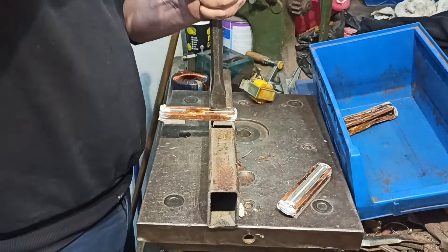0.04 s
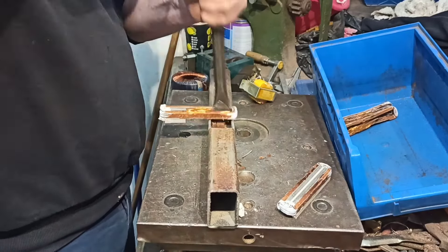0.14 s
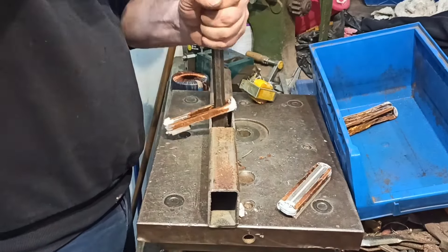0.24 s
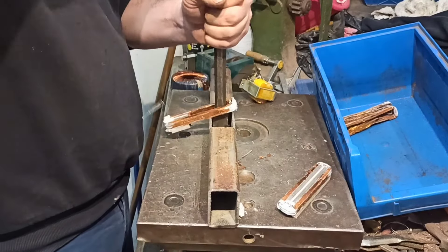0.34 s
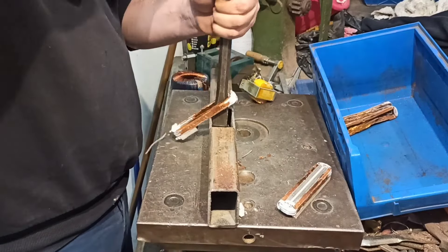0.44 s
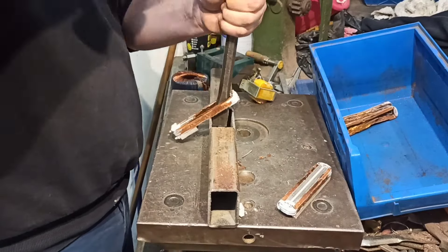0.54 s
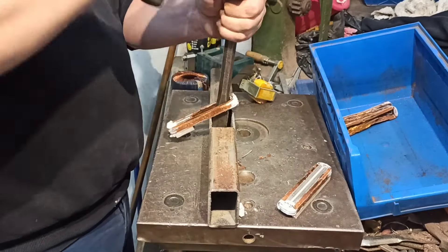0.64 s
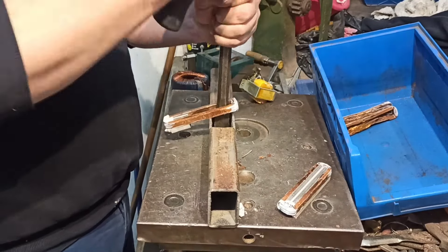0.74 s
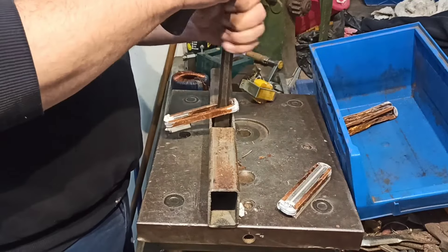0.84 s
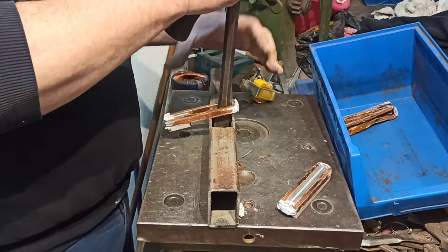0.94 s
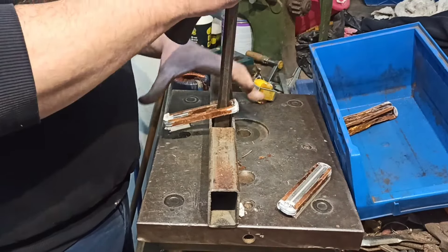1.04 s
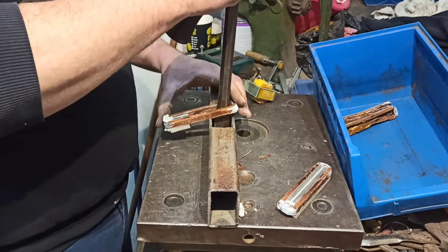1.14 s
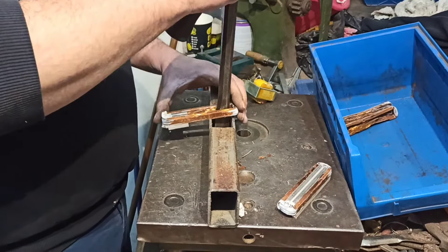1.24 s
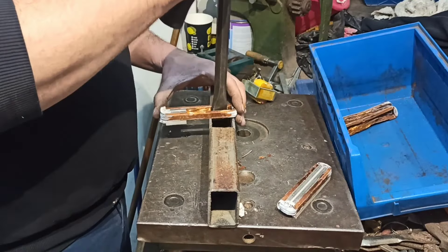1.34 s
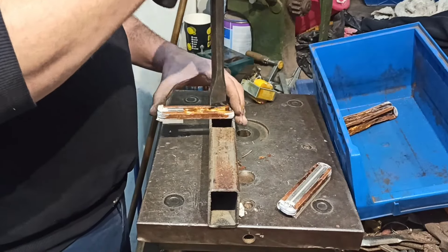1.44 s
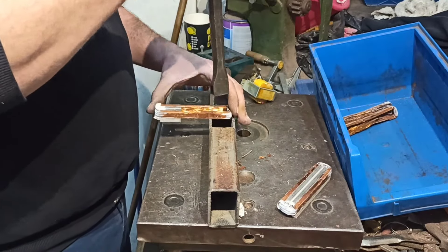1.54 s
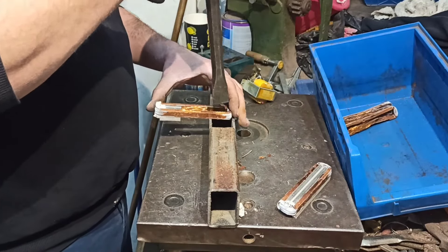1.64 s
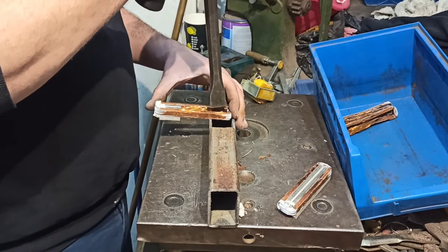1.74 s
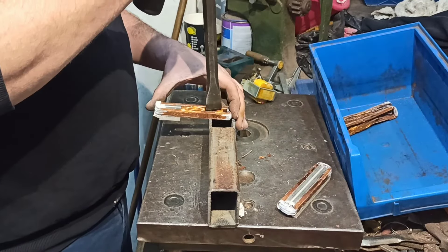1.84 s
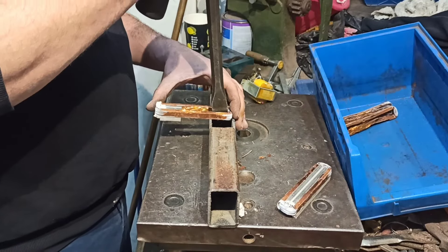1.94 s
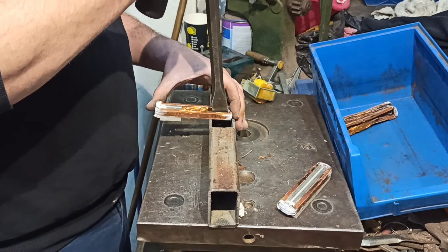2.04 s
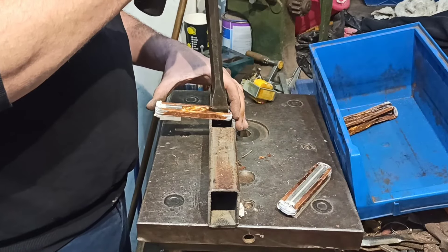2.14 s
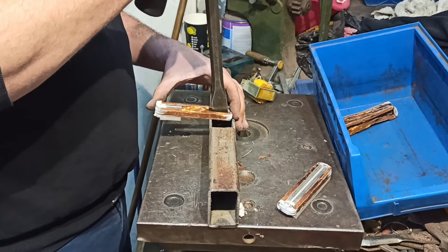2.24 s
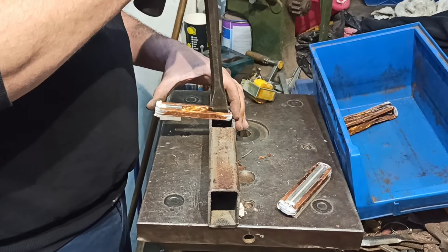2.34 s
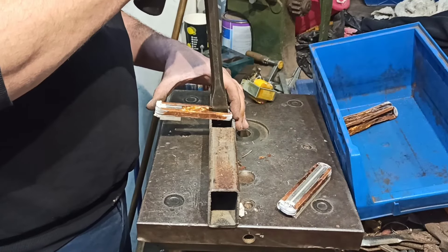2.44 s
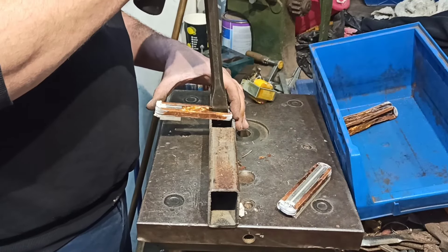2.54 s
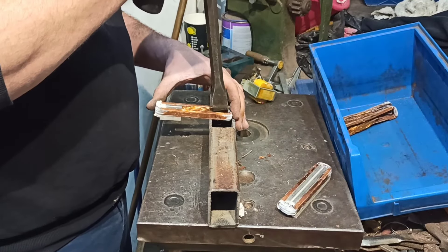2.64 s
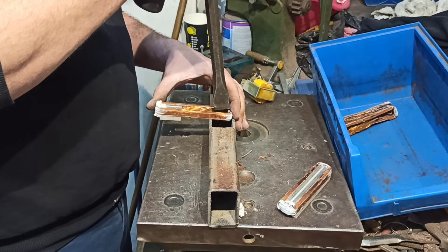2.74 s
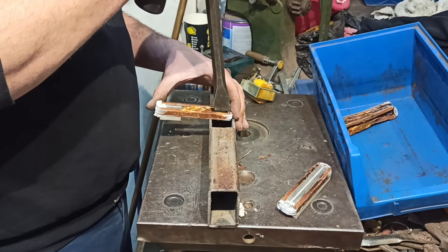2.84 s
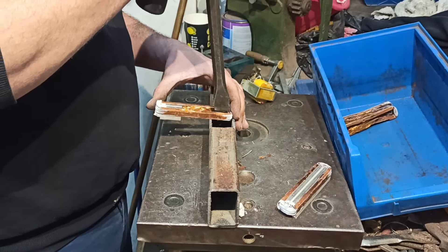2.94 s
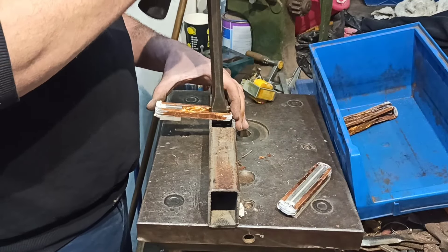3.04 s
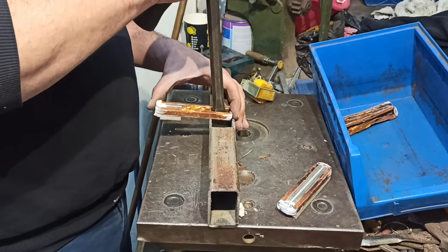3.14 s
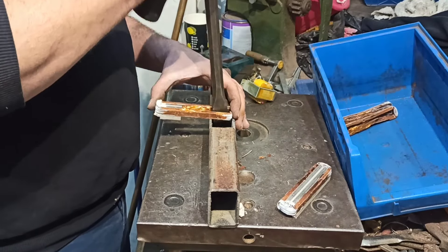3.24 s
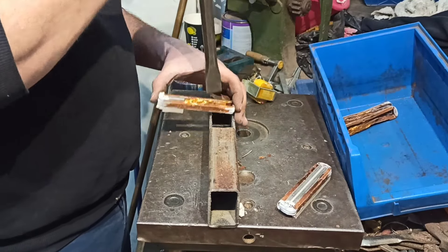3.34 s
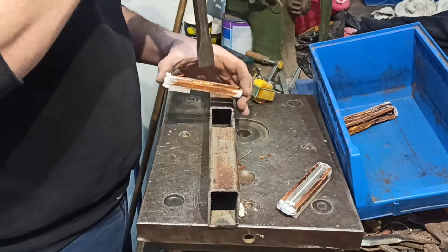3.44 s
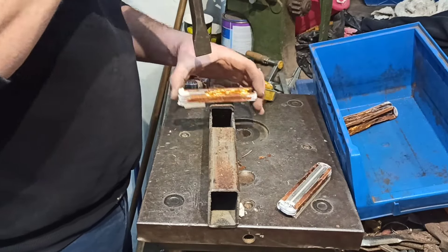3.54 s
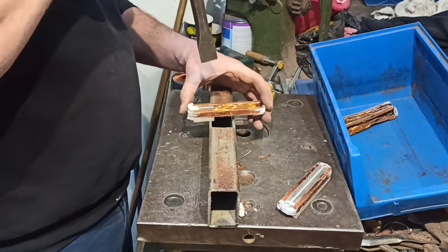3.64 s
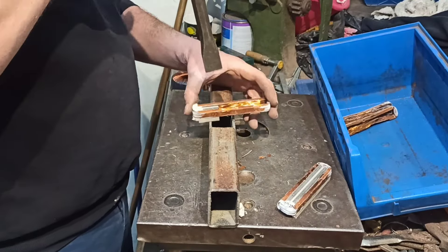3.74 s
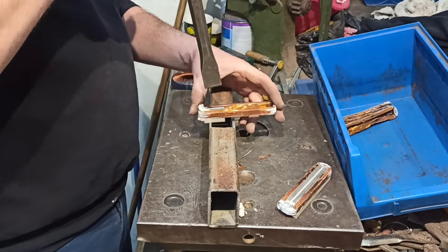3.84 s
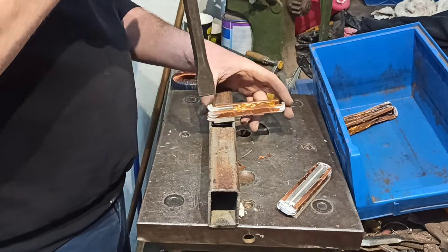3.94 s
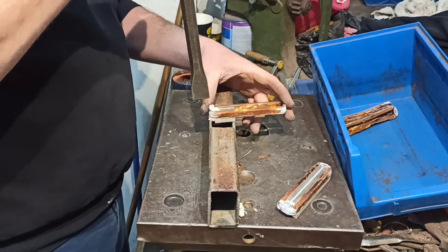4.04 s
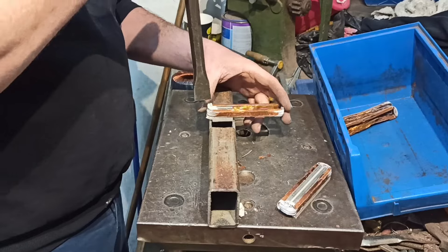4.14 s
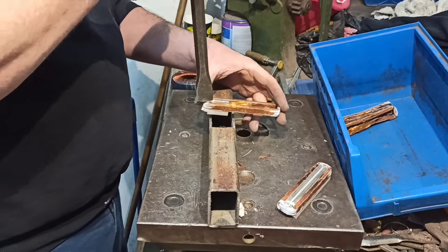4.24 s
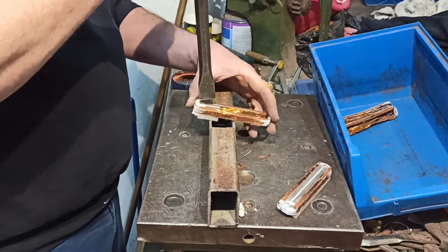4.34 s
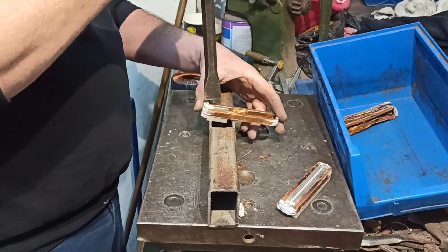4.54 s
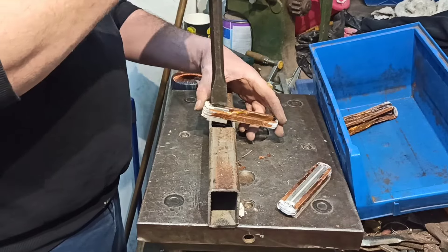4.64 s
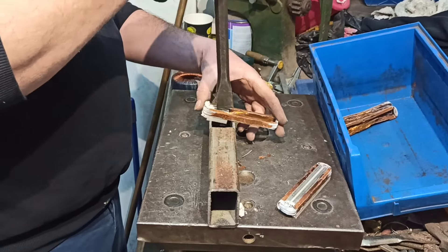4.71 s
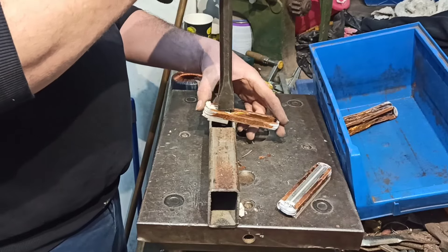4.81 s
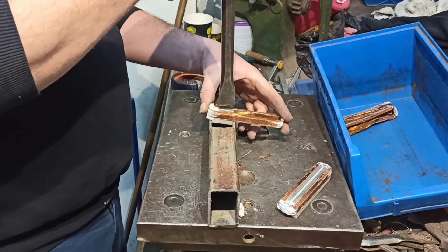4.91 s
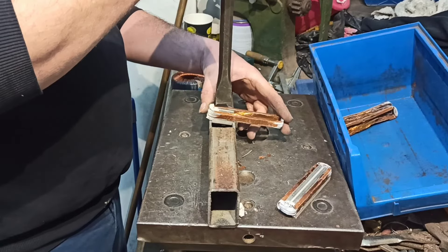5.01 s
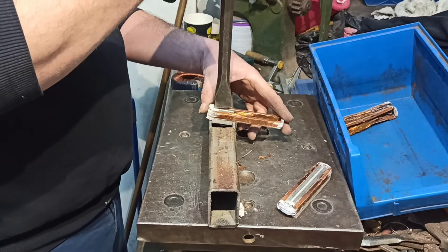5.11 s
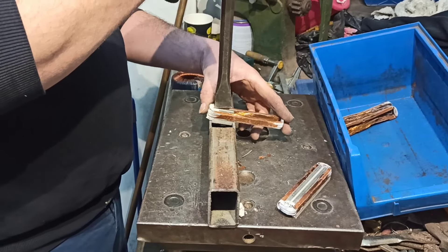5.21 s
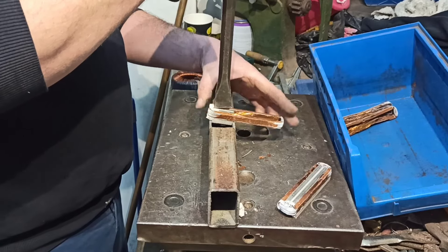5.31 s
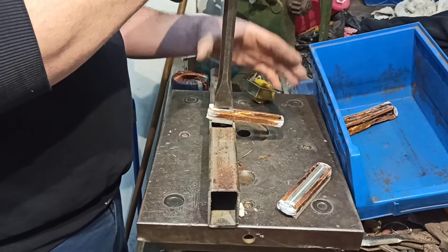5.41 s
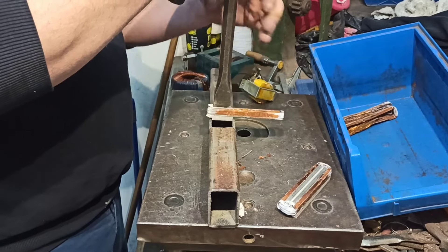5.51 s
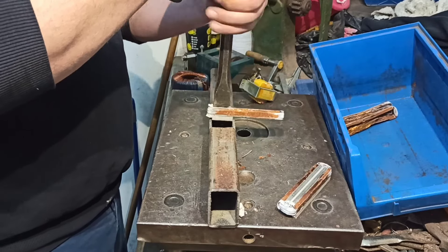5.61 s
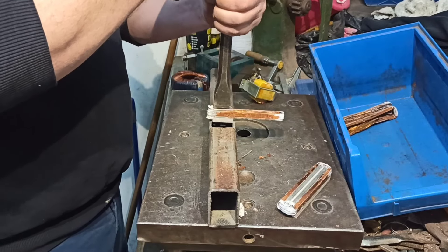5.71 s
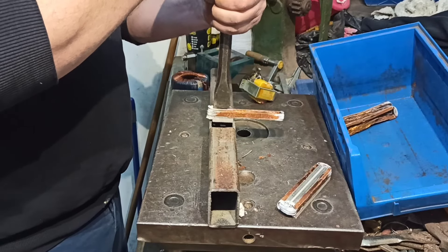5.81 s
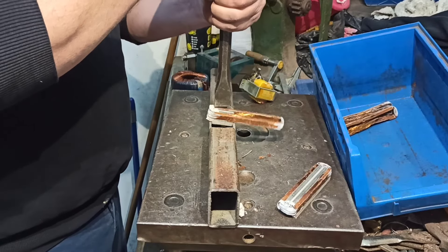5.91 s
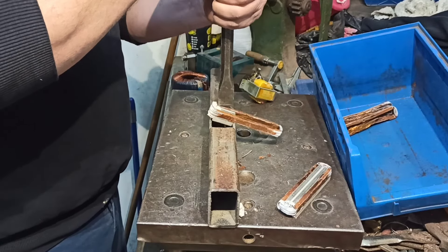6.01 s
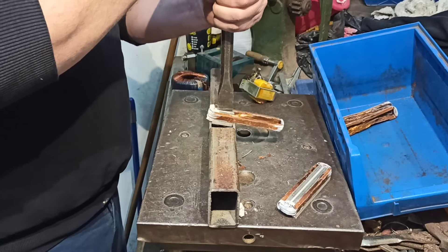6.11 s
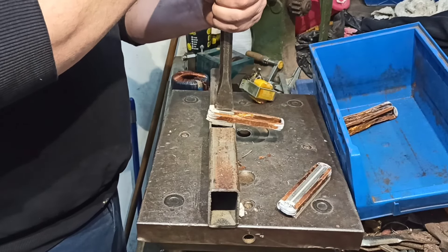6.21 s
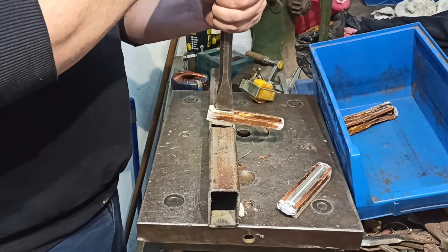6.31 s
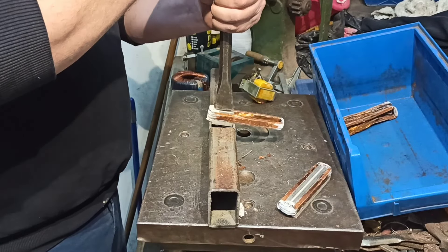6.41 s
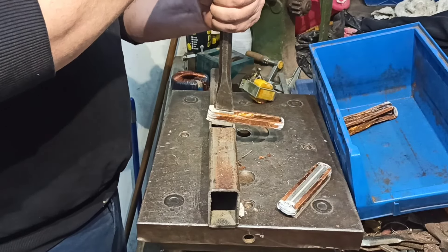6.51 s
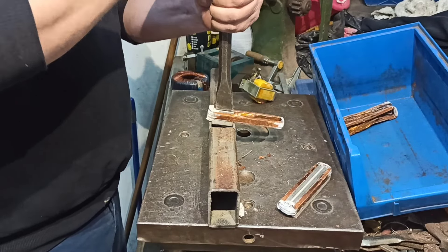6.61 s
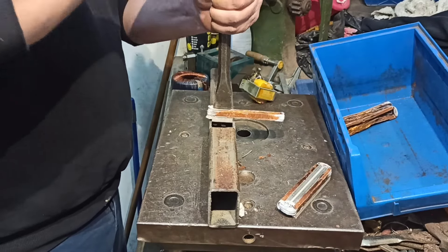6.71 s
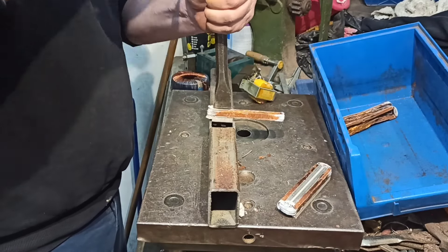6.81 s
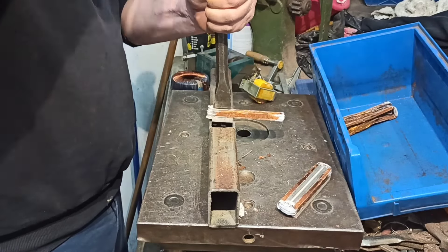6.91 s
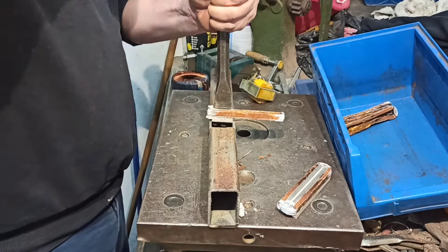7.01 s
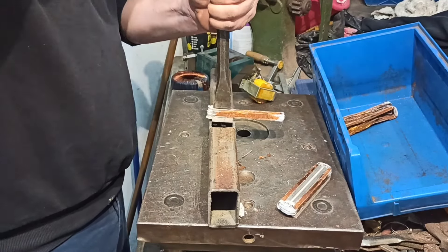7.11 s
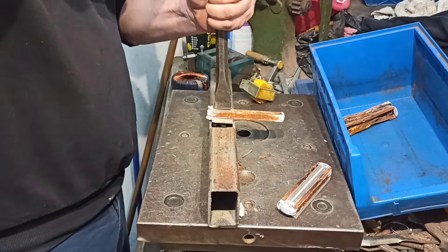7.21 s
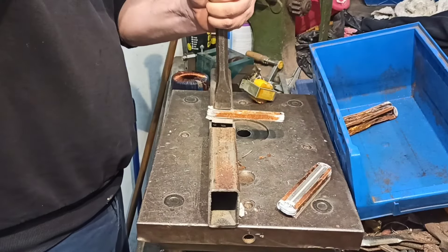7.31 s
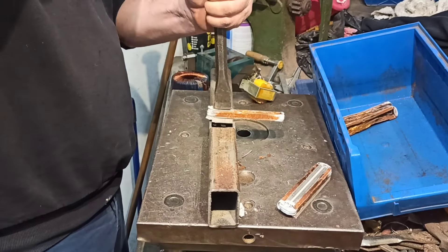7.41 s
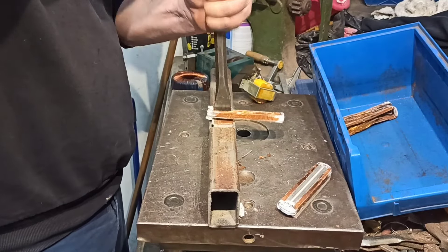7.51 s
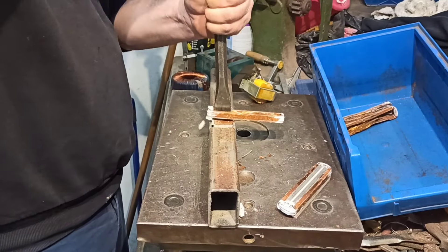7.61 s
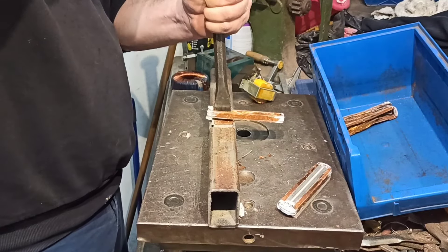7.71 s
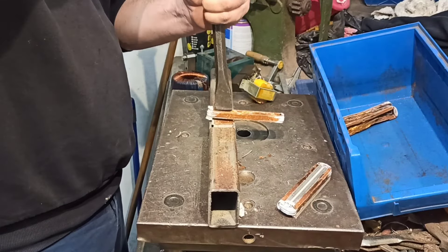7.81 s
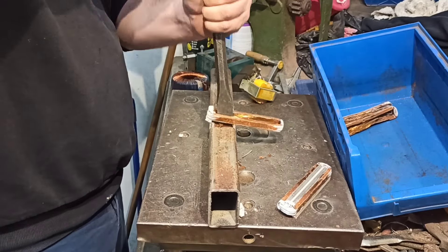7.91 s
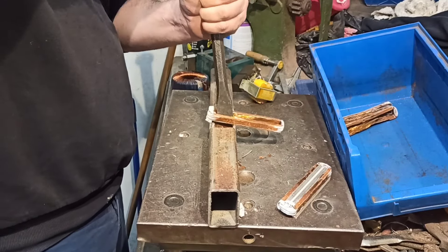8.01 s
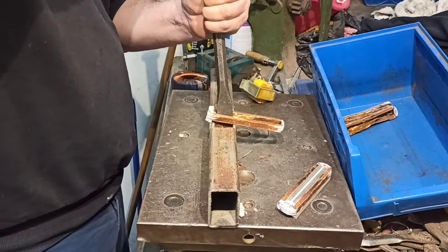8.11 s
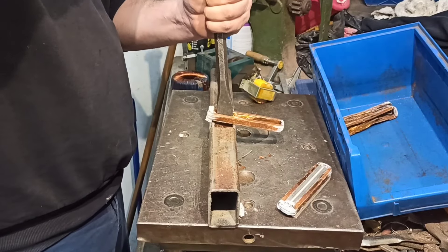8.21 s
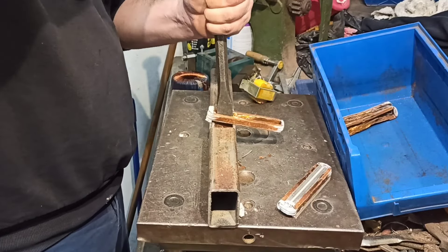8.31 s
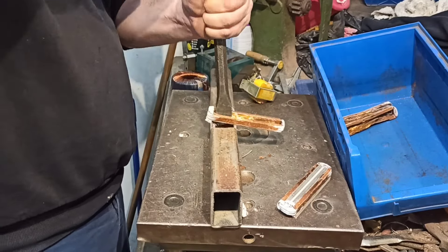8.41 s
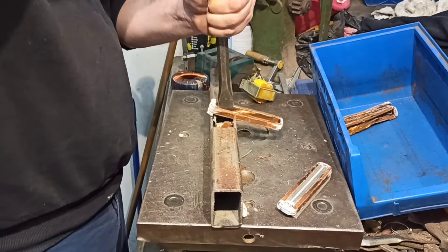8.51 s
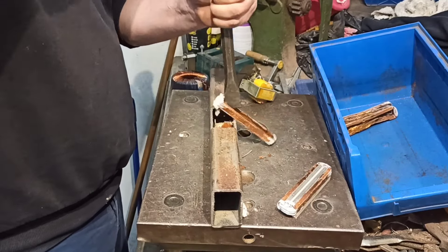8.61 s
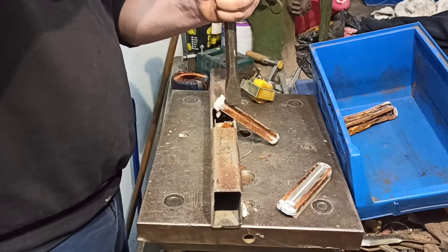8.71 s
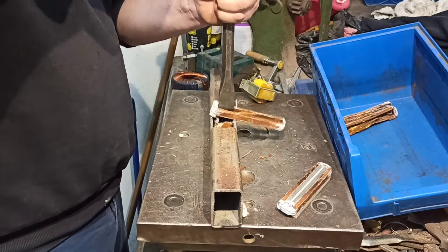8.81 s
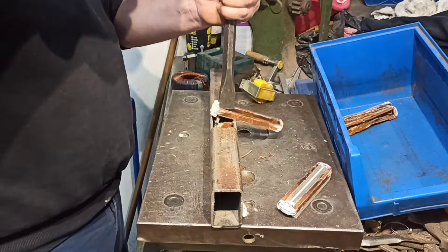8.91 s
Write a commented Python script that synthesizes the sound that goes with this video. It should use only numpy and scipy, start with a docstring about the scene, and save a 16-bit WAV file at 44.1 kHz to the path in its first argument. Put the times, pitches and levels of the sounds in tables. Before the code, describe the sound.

Close-up metalwork on a steel bench: a sharp, bright opening strike with a small rebound, then several seconds of light handling clinks, hollow tube knocks and brief rusty scrapes, including a rapid skipping rattle. After a near-silent pause, four chisel blows, the first weak, the last biting deep and ringing longest. Two final clinks. The room rings briefly over faint hum; a limiter flattens the peaks.

```python
"""A hammer blow drives a cold chisel into a small transformer core lying on a steel tube on a workbench.
Then the core is prised, lifted and set down with small clinks; the chisel squeaks faintly and skips
free, and the core is dragged in short rasps. Four more blows follow, and two last clinks.
Steel is made of dying sines plus short noise cracks, and drags of random tiny slips. The room rings
after each sound over quiet air and hum, and the recorder's limiter holds the loud blows down."""
import sys
import numpy as np
from scipy import signal
from scipy.fft import rfft, irfft
from scipy.io import wavfile
from scipy.ndimage import uniform_filter1d

SR = 44100
rng = np.random.default_rng(int(sys.argv[2]) if len(sys.argv) > 2 else 0)


def digitize_waveform(pressure):
    """Quantize a signal to 16-bit integers and store it at the path in sys.argv[1].

    Rows of a 2-D input are taken as channels; values are limited to [-1, 1].
    """
    field = np.atleast_2d(pressure).T
    bounded = np.clip(field, -1, 1)
    quanta = np.round(bounded * 32767).astype(np.int16)
    wavfile.write(sys.argv[1], SR, quanta)


N = 394694


def gain_of(db):
    """Turns decibels into an amplitude factor."""
    return 10 ** (np.asarray(db) / 20)


def evened(x):
    """Scales a sound to an rms (average strength) of 1."""
    return x / np.sqrt(np.mean(x ** 2) + 1e-20)


def read(points, hz):
    """Reads a table between its points, on a log-frequency axis."""
    f, value = np.transpose(points)
    return np.interp(np.log(hz + 1), np.log(f + 1), value)


def add(mix, start_s, sound):
    """Mixes a sound in from a start time, cut off at the end of the mix."""
    part = mix[round(start_s * SR):][:len(sound)]
    part += sound[:len(part)]


def noise(spectrum, size, tilt_db=0):
    """Noise of rms 1 shaped by a spectrum, tilted by so many dB per octave."""
    hz = np.fft.rfftfreq(size, 1 / SR)
    db = read(spectrum, hz) + tilt_db * np.log2(np.clip(hz, 300, 12000))
    random_phase = np.exp(2j * np.pi * rng.random(len(hz)))
    return evened(irfft(random_phase * gain_of(db), size))


def ring(modes, length=1, tilt_db=0, spread_db=0.5):
    """Struck steel as dying sines; mode levels vary a little by chance, and the tilt acts above 3600 Hz."""
    hz, db, t60 = np.transpose(modes)[:, :, None]
    t = np.arange(SR // 2) / SR
    phase, luck = rng.random((2, len(modes), 1))
    tilt = tilt_db * np.log2(np.maximum(hz / 3600, 1))  # dB per octave
    db = db + spread_db * (2 * luck - 1) + tilt
    # t60 is the time to fall by 60 dB, a factor of 1000
    level = gain_of(db) * np.exp(-np.log(1000) * t / (t60 * length))
    sines = level * np.sin(2 * np.pi * (hz * t + phase))
    soft_start = -np.expm1(-t / 0.0029)
    return sines.sum(0) * soft_start


# spectrum of the still workshop air: (frequency [Hz], density [dB per Hz])
AIR_SPECTRUM = [(20, -47.5), (45, -29.5), (62, -9.5), (86, 2.5), (110, -7), (140, -5.5), (300, -8.5),
                (500, -14), (800, -17.5), (1500, -28), (5500, -40.5), (7000, -35), (9000, -42),
                (15000, -43)]
# faint hum notes: (frequency [Hz], level [dB])
HUM_NOTES = [(87, -75), (215, -74.5), (390, -84), (781, -86)]


def background(air_db=-69, waver_hz=5):
    """Still air is shaped noise; each hum note is a sine whose phase wanders slowly."""
    t = np.arange(N) / SR
    out = gain_of(air_db) * noise(AIR_SPECTRUM, N)
    slow = np.fft.rfftfreq(N, 1 / SR) < waver_hz
    for hz, db in HUM_NOTES:
        waver = evened(irfft(rfft(rng.standard_normal(N)) * slow, N))
        out += gain_of(db) * evened(np.sin(2 * np.pi * hz * t + waver))
    return out


# how long the workshop rings in each band: (frequency [Hz], time to fall 60 dB [s])
ROOM_DECAY = [(100, 0.41), (400, 0.45), (1500, 0.57), (4000, 0.53), (7500, 0.48), (14000, 0.31)]


def workshop(x, build_s=0.00033, clutter_db=-4, wall_s=0.0075, lowest_hz=95):
    """Nearby clutter answers first, the walls a little later and stronger; each band dies at its own speed."""
    hz, t, bands = signal.stft(rng.standard_normal(SR), SR, nperseg=256)
    decay = np.exp(-np.log(1000) * t / read(ROOM_DECAY, hz)[:, None])
    tail = signal.istft(bands * decay, SR, nperseg=256)[1]
    t = np.arange(len(tail)) / SR
    tail *= -np.expm1(-t / build_s) * gain_of(clutter_db * (t < wall_s))
    # the small room holds no deep bass
    no_bass = signal.butter(2, lowest_hz, "highpass", fs=SR, output="sos")
    tail = signal.sosfilt(no_bass, tail)
    return signal.fftconvolve(x, tail / np.linalg.norm(tail))[:N]


def stroke(length_s):
    """Pressure that swells and eases off in one arch."""
    return np.sin(np.pi * np.arange(0, length_s, 1 / SR) / length_s)


def squeak(start_s=1.58, length_s=0.18, hz=6380, peak_db=-76.5):
    """The chisel edge leans into the steel: a faint, thin sine that swells and fades."""
    out, pressure = np.zeros(N), stroke(length_s)
    note = np.sin(2 * np.pi * hz * np.arange(len(pressure)) / SR)
    add(out, start_s, gain_of(peak_db) * pressure ** 2 * note)
    return out


# ringing notes of the steel tube, also used by clinks and blows:
# (frequency [Hz], level [dB], time to fall 60 dB [s])
TUBE_MODES = [(861, -18, .15), (2336, -13, .25), (2410, -9, .2), (2560, -17, .2), (3079, -12, .35),
              (3272, -10, .3), (3666, -7, .2), (3738, -13, .25), (3946, -16, .25), (4253, -14, .25),
              (4572, -17, .25), (5070, -20, .25), (5335, -19, .3), (5725, -14, .2), (5852, -11, .3),
              (5970, -14, .2), (6323, -2, .3), (6616, -2, .2), (6822, -2, .25), (6850, -5, .2),
              (7271, 0, .3), (7635, -3, .2), (8145, -10, .25)]
# notes that sliding feeds most: (frequency [Hz], level [dB], time to fall 60 dB [s])
SQUEAL_MODES = [(3079, 0, .3), (2380, 2, .07), (305, -2, .12)]
# steel sliding over rust: (frequency [Hz], density [dB per Hz])
RASP_SPECTRUM = [(30, -35), (100, -19), (300, 6), (450, -28.5), (750, 8.5), (1200, -43), (1750, 8),
                 (1920, -19.5), (2150, 6), (2450, -6), (2700, -16), (3700, -7), (5200, -26), (7000, -12.5),
                 (10000, -39)]
# the core dragged over the tube: (start time [s], length [s], level of the rubbing force [dB])
DRAG_STROKES = [(3.795, 0.23, -57.5), (4.162, 0.02, -68.5), (4.469, 0.048, -51.5), (4.864, 0.06, -60),
                (5.535, 0.029, -80), (5.944, 0.096, -67)]


def drags(slips_per_s=600, rasp_db=-3, tube_db=-7, squeal_db=-4):
    """Tiny random slips rasp on the rusty tube and keep it singing."""
    force, t = np.zeros(N), np.arange(1024) / SR
    for start_s, length_s, db in DRAG_STROKES:
        add(force, start_s, gain_of(db) * stroke(length_s))
    slip_happens = rng.random(N) < slips_per_s / SR
    slips = evened(rng.standard_normal(N) * slip_happens) * force
    rasp = noise(RASP_SPECTRUM, size=1024) * np.exp(-t / .004)
    bodies = (rasp, rasp_db), (ring(TUBE_MODES), tube_db), (ring(SQUEAL_MODES), squeal_db)
    out = np.zeros(N)
    for body, db in bodies:
        # each slip sets off a copy of the body's sound
        out += gain_of(db) * signal.oaconvolve(slips, body / np.linalg.norm(body))[:N]
    return out


# steel hitting steel: (frequency [Hz], density [dB per Hz])
CRACK_SPECTRUM = [(25, -29.5), (70, -13), (200, -4), (450, -10.5), (720, 4), (1150, -8.5), (1900, 5),
                  (2800, -7), (3800, 6), (5200, -5.5), (6600, 6), (7900, 4), (8800, -11), (12000, -11),
                  (15000, -16)]


def crack(tilt_db, contact_s, chatter_db=3, rise_s=0.00024):
    """Steel chatters on steel: unsteady noise that dies within milliseconds."""
    t = np.arange(SR // 2) / SR
    wander = evened(uniform_filter1d(rng.standard_normal(len(t)), size=40))
    chatter = evened(gain_of(chatter_db * wander))
    fade = np.exp(-t / max(contact_s, 1 / SR)) * -np.expm1(-t / rise_s)
    return noise(CRACK_SPECTRUM, len(t), tilt_db) * chatter * fade


# ringing notes of the chisel, also used by skips and blows:
# (frequency [Hz], level [dB], time to fall 60 dB [s])
CHISEL_MODES = [(3595, -10, .13), (3700, -9, .11), (5610, -17, .13), (7550, -8, .08), (7603, 0, .15),
                (7645, -7, .1), (1750, -19, .05), (6020, -18, .06), (8020, -15, .1), (13800, -29, .08),
                (15300, -24, .04)]
# the tube rocking on the bench, also used by skips: (frequency [Hz], level [dB], time to fall 60 dB [s])
KNOCK_MODES = [(140, -7, 0.26), (214.7, -11.5, 0.087), (299.6, 3, 0.1), (352, -5, 0.083),
               (697.6, -1.5, 0.071), (786, -1, 0.069)]


def touch(tilt_db, tube_db, chisel_db, knock_db, contact_s=0.006, held_length=.65, held_tilt_db=-16):
    """One light contact; the hands shorten the ring (a factor) and mute the chisel's top notes (dB per octave)."""
    tube = gain_of(tube_db) * ring(TUBE_MODES, held_length, tilt_db, spread_db=2.5)
    chisel = gain_of(chisel_db) * ring(CHISEL_MODES, held_length, held_tilt_db, spread_db=0)
    knock = gain_of(knock_db) * ring(KNOCK_MODES, spread_db=5)
    return crack(tilt_db, contact_s) + tube + chisel + knock


# clinks while the work is handled: (time [s], level [dB], brightness [dB per octave], tube ring [dB],
# chisel ring [dB], hollow knock [dB], second touch compared with the first [dB])
CLINK_EVENTS = [(0.496, -44.5, -5, 4.5, -23, -18, -12), (0.736, -46.5, 2.5, -28, -27, -23, -7),
                (0.795, -52.5, 0, -21, -3, -3, 6), (0.924, -58, 0, -26, -3, -17, -20),
                (1.21, -67, -4, -11, 8.5, -15, -20), (1.292, -60, 19, -32, -25, -15, -15),
                (1.319, -57.5, -1, -14, 14, -9, -21), (1.391, -48.5, -1, -3.5, 0, -18, 0.5),
                (1.956, -57, -8.5, -25, -9, -12, -15), (2.006, -68.5, 5, -30, -19, -17, -24),
                (2.905, -64, 6.5, -16.5, -6, -27, -9), (3.379, -57.5, -16.5, -31, -42, -3.5, -18),
                (3.431, -60.5, 2, -8, -3, -17, -3), (3.697, -44, -4, -4.5, -10, -3.5, -6.5),
                (4.177, -53.5, -4.5, -24, -4, -4, -2.5), (4.406, -44, -1.5, -4.5, -13, -18, -35),
                (4.822, -51, -11, -18, -29, -6.5, -19), (4.957, -47.5, -3, -9.5, -11, -4.5, -13),
                (5.154, -48.5, -7, -29, -6, -6, -15), (5.534, -55, -4.5, -16.5, -5, -3.5, 0.5),
                (5.748, -52.5, 8.5, -19.5, -16, -7, -19), (6.009, -51.5, -5.5, -28, -14, -6, -6),
                (6.112, -61.5, -5.5, -22, -8, -8, -7), (6.171, -53, -5.5, -28, -17, -21, -9),
                (6.703, -53.5, -4, -24, -31, -10, -15), (6.748, -64, -3, -32, -28, 5.5, -8),
                (8.706, -48.5, -3, -8, -5, -12, -27), (8.793, -50, -3.5, -10.5, -15, -6, -9)]


def clinks(settle_s=0.019, settle_tilt_db=-3.5):
    """The work is set down: one end touches first, the other a moment later and duller (dB per octave)."""
    out = np.zeros(N)
    for start_s, db, tilt_db, tube_db, chisel_db, knock_db, second_db in CLINK_EVENTS:
        first = touch(tilt_db, tube_db, chisel_db, knock_db)
        second = touch(tilt_db + settle_tilt_db, tube_db, chisel_db, knock_db)
        add(out, start_s, gain_of(db) * first)
        add(out, start_s + settle_s, gain_of(db + second_db) * second)
    return out


# ringing notes of the core, also used by blows: (frequency [Hz], level [dB], time to fall 60 dB [s])
CORE_MODES = [(1690, 0, .27), (2428, -6, .25), (3585, -4, .2), (3664, -6, .25), (4239, -4, .3),
              (4576, -5, .35), (6246, -1, .35), (861, -14, .3), (1735, -9, .15), (2320, -8, .35),
              (6560, -4, .2)]
# thud of the bench, also used by blows: (frequency [Hz], level [dB], time to fall 60 dB [s])
BENCH_MODES = [(69.3, -10, 0.087), (94, -2.5, 0.12), (131, -4, 0.18), (153, -5, 0.1), (733, -10.5, 0.19)]


def skips(start_s=3.121, first_gap_s=.009, gap_growth=1.6, first_db=-39.5, rise_db=4,
          count=4, contact_s=0.004, tilt_db=-1, chisel_db=-5, core_db=-17,
          held_length=0.42, held_tilt_db=-8, bench_db=-12, knock_db=-23):
    """The prised chisel skips over the core, each time harder and after a longer gap; then the core drops."""
    out, skip_s = np.zeros(N), start_s
    for k in range(count):
        chisel = gain_of(chisel_db) * ring(CHISEL_MODES, held_length, held_tilt_db)
        sound = crack(tilt_db, contact_s) + chisel + gain_of(core_db) * ring(CORE_MODES, held_length)
        if k == count - 1:  # the last contact rocks the tube and thumps the bench
            sound += gain_of(bench_db) * ring(BENCH_MODES) + gain_of(knock_db) * ring(KNOCK_MODES)
        add(out, skip_s, gain_of(first_db + rise_db * k) * sound)
        skip_s += first_gap_s * gap_growth ** k
    return out


BLOW_LENGTH = .24  # the chisel's ring is this fraction of its full decay time when it does not bite


def rebound(contact_s, tilt_db=-1, chisel_db=-4, ring_tilt_db=6, bench_db=-23.5):
    """The hammer falls back on the chisel without biting, and the bench thuds."""
    chisel = gain_of(chisel_db) * ring(CHISEL_MODES, BLOW_LENGTH, ring_tilt_db)
    return crack(tilt_db, contact_s) + chisel + gain_of(bench_db) * ring(BENCH_MODES)


# hammer blows on the chisel: (time [s], level [dB], bite through to the tube [0-1],
# crack brightness [dB per octave], chisel ring [dB], core ring [dB], bench thud [dB], shove [dB],
# rebound compared with the blow [dB])
BLOW_EVENTS = [(0.202, -5, 0.8, 5.5, -11.5, -17, -25, -11, -10.5),
               (7.239, -28, 0.03, 0, -7.5, -52, -10.5, -21, -9),
               (7.5677, -13.5, 0, -0.5, 6.5, -34, -28.5, -11.5, -14.5),
               (7.944, -17.5, 0.08, 0.5, 9, -42, -22.5, -12, -25),
               (8.441, -12, 0.94, 0.5, -6, -25, -18, -5, -20)]


def blows(contact_s=0.0032, shove_s=.003, rebound_s=.044, tube_db=-41, bite_tube_db=21,
          bite_length=1.0, ring_tilt_db=7.5):
    """Each blow rings the chisel, cracks into the core and shoves the bench; then the hammer drops back once."""
    out = np.zeros(N)
    u = np.arange(SR // 2) / SR / shove_s
    push = (1 - u) * np.exp(-u)
    for start_s, db, bite, tilt_db, chisel_db, core_db, bench_db, shove_db, rebound_db in BLOW_EVENTS:
        # a deep bite frees the chisel to ring longer and passes the blow on to the tube
        length = BLOW_LENGTH + bite_length * bite
        # a hard blow favours the high notes
        chisel = gain_of(chisel_db) * ring(CHISEL_MODES, length, ring_tilt_db)
        tube = gain_of(tube_db + bite_tube_db * bite) * ring(TUBE_MODES, tilt_db=ring_tilt_db)
        core = gain_of(core_db) * ring(CORE_MODES)
        thud = gain_of(bench_db) * ring(BENCH_MODES) + gain_of(shove_db) * push
        add(out, start_s, gain_of(db) * (crack(tilt_db, contact_s) + chisel + tube + core + thud))
        add(out, start_s + rebound_s, gain_of(db + rebound_db) * rebound(contact_s))
    return out


def scene(blow_room_db=0, handling_room_db=-5):
    """Blows and handling on the bench, heard with the room and its background."""
    loud = blows()
    soft = clinks() + skips() + drags() + squeak()
    room = workshop(gain_of(blow_room_db) * loud + gain_of(handling_room_db) * soft)
    return (loud + soft + room + background())[None]


# microphone colour, thin deep bass and a dip in the treble: (frequency [Hz], gain [dB])
MICROPHONE_COLOUR = [(15, -17), (50, -2.5), (8200, -0.5), (8800, -8), (9600, -16.5), (11000, -17),
                     (12000, 2.5)]


def record(dry, limit_db=-26, squeeze=0.89, recovery_db_per_s=110, edge_hz=15850):
    """Microphone colour; a fast limiter ducks each blow and lets the ring swell back; then the top is cut."""
    colour = gain_of(read(MICROPHONE_COLOUR, np.fft.rfftfreq(N, 1 / SR)))
    heard = irfft(rfft(dry[0]) * colour, N)
    power_db = 10 * np.log10(abs(uniform_filter1d(heard ** 2, size=90)) + 1e-12)
    # follows every rise at once, then falls at the recovery speed
    fall = np.arange(N) / SR * recovery_db_per_s
    followed_db = np.maximum.accumulate(power_db + fall) - fall
    over_db = np.maximum(followed_db - limit_db, 0)
    # squeeze is the share of the excess that is taken away
    ducked = heard / gain_of(squeeze * uniform_filter1d(over_db, size=60))
    top_cut = signal.firwin(511, edge_hz, window=("kaiser", 9), fs=SR)
    return signal.oaconvolve(ducked, top_cut, "same")[None]


dry = scene()
out = record(dry)
digitize_waveform(out)
```